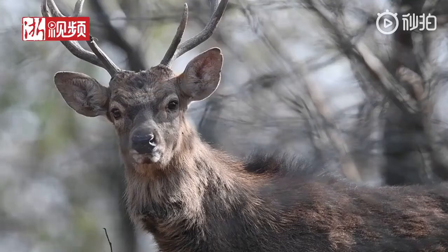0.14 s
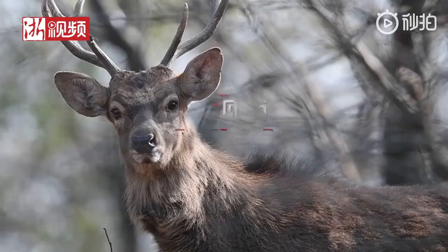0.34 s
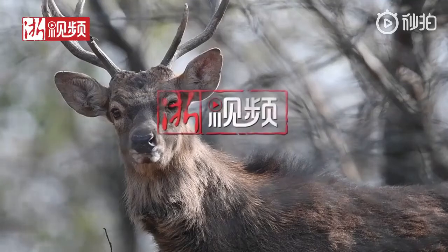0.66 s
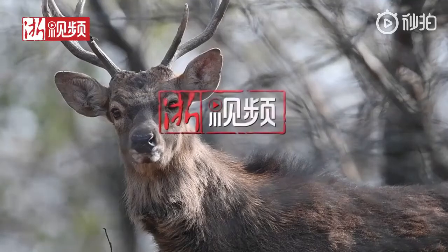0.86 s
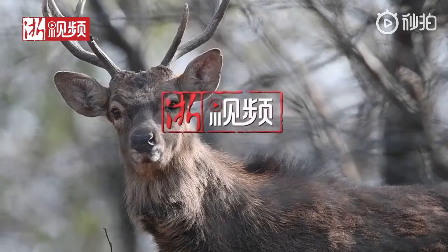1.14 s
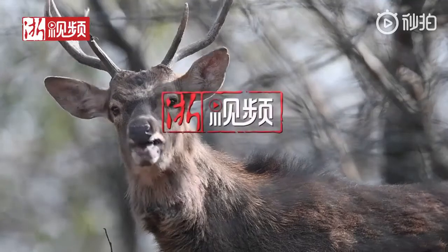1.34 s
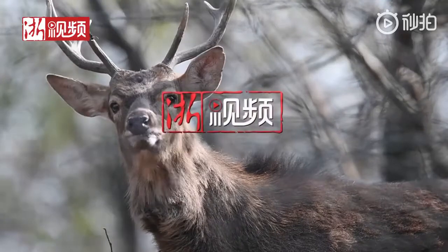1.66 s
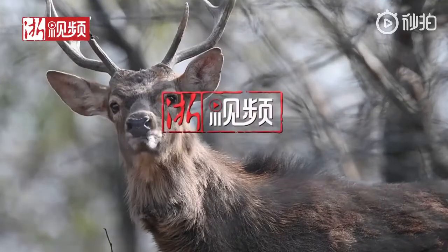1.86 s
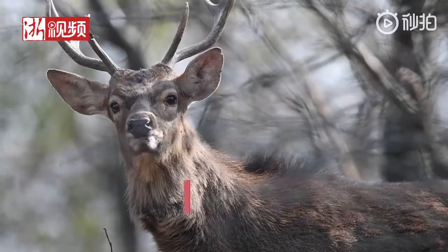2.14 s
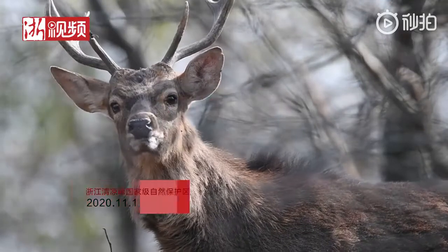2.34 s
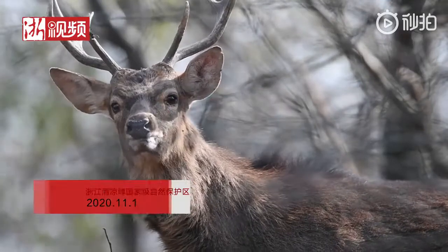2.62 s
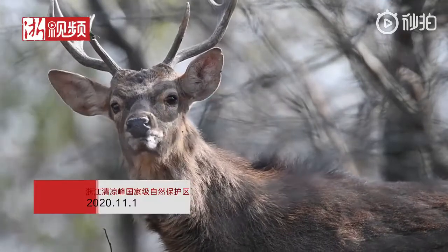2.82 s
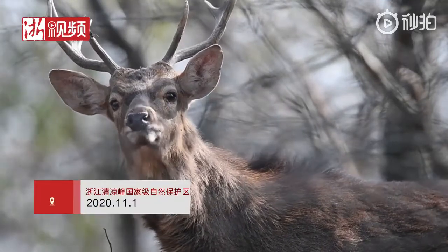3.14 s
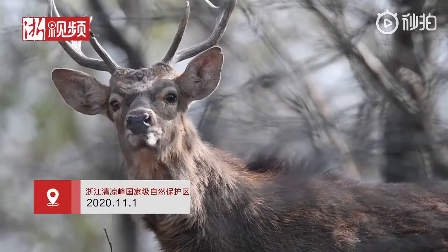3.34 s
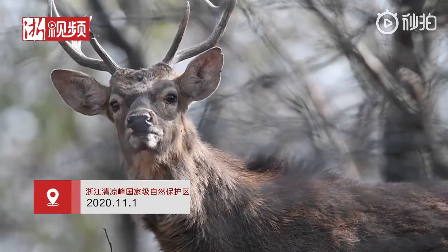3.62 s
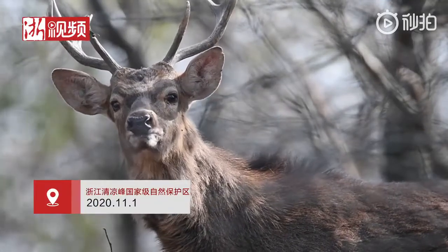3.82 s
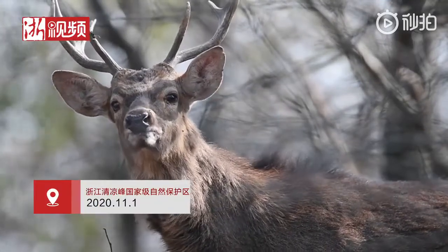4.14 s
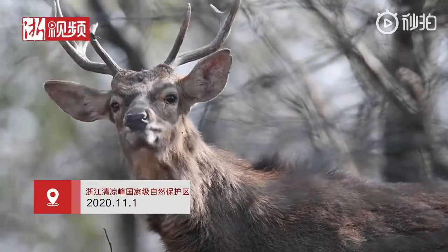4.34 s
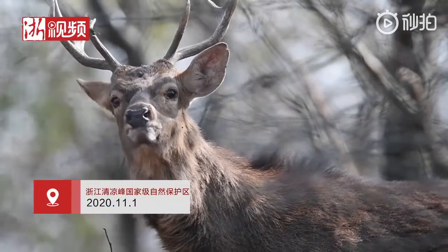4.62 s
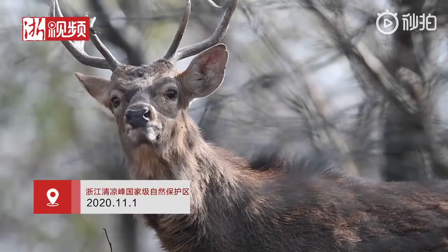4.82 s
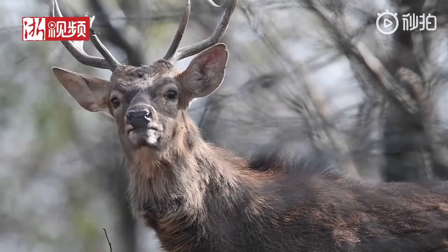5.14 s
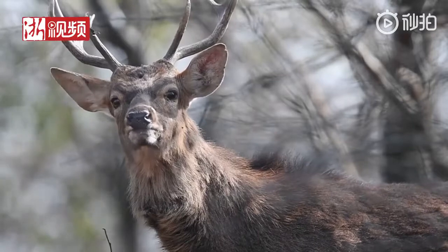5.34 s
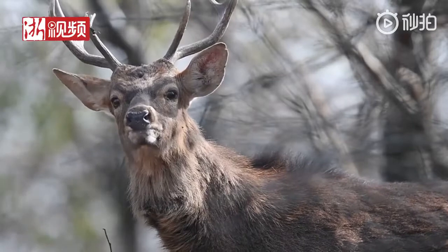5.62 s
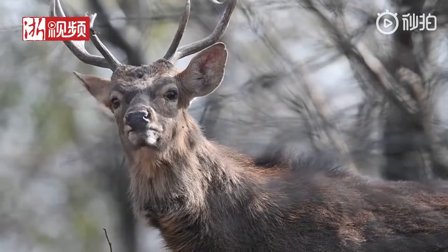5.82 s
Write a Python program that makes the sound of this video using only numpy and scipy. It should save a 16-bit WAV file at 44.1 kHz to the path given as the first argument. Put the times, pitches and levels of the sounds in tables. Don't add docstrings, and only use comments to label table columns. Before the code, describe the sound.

Three short, shrill deer whistles ring out among trees with long scattered tails, while breeze rustles leaves and lightly bumps the microphone.

```python
import sys
import numpy as np
from scipy import signal
from scipy.fft import rfft, irfft
from scipy.io import wavfile
from scipy.ndimage import uniform_filter1d, minimum_filter1d

SR = 44100
rng = np.random.default_rng(int(sys.argv[2]) if len(sys.argv) > 2 else 0)


def pcm_store(signal):
    levels = np.round(np.clip(np.atleast_2d(signal), -1, 1) * 32767)
    wavfile.write(sys.argv[1], SR, levels.astype(np.int16).T)


def makeup_ratio(level_db):
    decades = np.asarray(level_db, float) / 20
    return 10 ** decades


N = 263321

# [f/Hz, level/dB per Hz]
LEAF_SPECTRUM = [(18, -48.5), (30, -15), (56, -6), (154, -17), (364, -14.5), (460, -13.5), (716, -12.5),
                 (859, -14), (1090, -12.5), (2250, -10.5), (2990, -15.5), (5700, -16.5), (8250, -19.5),
                 (11300, -18), (15000, -30)]
# [f/Hz, share of swing]
GUST_SHARE = [(100, 0.33), (400, 1.1), (1500, .9), (5000, 0.9), (13000, .9)]
# [f/Hz, likeness 0..1]
LIKENESS = [(100, .9995), (250, .99), (500, .9), (800, .8), (1500, .55), (4000, .6), (12000, .5)]
# [f/Hz, lead/rad]
LEFT_LEAD = [(0, 0), (860, 0.3), (1810, 3.2), (2760, 3.9), (5000, 6.8), (5600, 9.1), (6030, 9.1),
             (8010, 19.5), (8440, 20.7), (9470, 20.8), (9910, 24.6), (11300, 25.5), (12700, 30.9),
             (14700, 31.9)]
# [peak t/s, level/dB over calm, rise/s, fall/s]
GUSTS = [
    (.55, 2.5, .3, .25),
    (.84, 7.5, .1, .2),
    (1.7, 7, 0.54, .2),
    (1.98, 2.5, .05, .2),
    (2.62, 3.5, 0.27, .35),
    (3.24, 8, .17, .2),
    (5.64, 9.5, 0.13, .55),
]
# [t/s, peak level/dB, f/Hz]
PUFFS = [(0.192, -49, 187), (0.291, -43.5, 132), (0.473, -39, 160), (0.61, -47, 92), (0.725, -44.5, 184),
         (0.82, -44, 103), (0.877, -47, 161), (1.191, -49.5, 122), (1.446, -47.5, 127),
         (1.705, -45.5, 210.4), (1.972, -35, 211), (2.111, -47, 116.7), (2.305, -45, 128),
         (2.528, -46, 168), (2.698, -46.5, 105), (2.732, -44.5, 180), (2.843, -40.5, 80), (2.888, -43, 108),
         (2.951, -40, 161), (3.317, -37.5, 162), (3.407, -44, 103), (3.502, -50, 105), (3.591, -46.5, 96),
         (3.662, -42, 196), (3.769, -45, 152), (4.344, -46, 119.2), (4.902, -55, 149.8), (5.071, -41, 189),
         (5.559, -49.5, 99), (5.786, -37, 116.4)]
# [peak t/s, level/dB over still air, rise/s, fall/s]
SPELLS = [(.27, 12, 0.2, .3), (.58, 21.5, 0.75, .22), (.85, 12, .05, .1), (1.97, 18, .04, .25),
          (2.55, 13, 0.24, .1), (3.0, 26.5, .42, .06), (3.32, 23, .2, .25), (3.69, 18.5, .2, .05),
          (3.79, 30, .05, .05), (4.36, 11, 0.025, .04), (4.91, 19, .05, .05), (5.09, 30.5, .14, .4),
          (5.81, 27.5, .13, .07)]
# [t/s, peak level/dB, f/Hz]
TWIG_TICKS = [
    (0.476, -49.5, 899),
    (2.956, -54, 1270),
    (5.515, -46, 609.5),
    (5.64, -40, 1210),
    (5.836, -46.5, 638),
]
# [t/s, pitch f/Hz, effort level/dB]
WHISTLE_1 = [
    (1.449, 3347, -31),
    (1.472, 3402, -21),
    (1.497, 3742, -7.5),
    (1.52, 3748, -9),
    (1.575, 3951, -5),
    (1.645, 3934, -6.5),
    (1.701, 3664, -4),
    (1.762, 3190, -23),
    (1.838, 1804, -56),
]
WHISTLE_2 = [
    (3.098, 3245, -34),
    (3.135, 3450, -9.5),
    (3.15, 3590, -10),
    (3.181, 3620, -5),
    (3.197, 3565, -13),
    (3.225, 3150, -21.5),
    (3.258, 2350, -46),
    (3.283, 1900, -66),
    (3.302, 1500, -53),
]
WHISTLE_3 = [
    (4.488, 3095, -38.5),
    (4.525, 3255, -11),
    (4.557, 3340, -8.5),
    (4.573, 3479, -7.5),
    (4.605, 3517, -3),
    (4.635, 3441, -10.5),
    (4.662, 3077, -12.5),
    (4.69, 2490, -47),
    (4.724, 1920, -53),
]
# [octave level/dB, upper overtone level/dB, rasp level/dB]
COLOURS = [
    (.4, -0.3, 1.05),
    (1.5, 6, 2),
    (2.5, -2.5, 0.3),
]
# [t/s, pitch f/Hz, effort level/dB]
SQUEAK = [
    (1.966, 1250, -58),
    (1.985, 1800, -63),
    (2.0, 2400, -63),
    (2.012, 2800, -58),
    (2.03, 3400, -58),
    (2.04, 3500, -70),
]
# [t/s, pitch f/Hz, effort level/dB]
SQUEAK_ECHO = [
    (2.005, 2010, -65),
    (2.04, 2695, -54.5),
    (2.075, 3050, -56),
    (2.13, 3110, -65),
]
# [f/Hz, width/Hz, boost/dB]
THROAT = [(1050, 90, 16), (1800, 100, 12), (2330, 110, 12), (2900, 150, 5)]
# [multiple, best f/Hz, width/Hz, level/dB]
UPPER_OVERTONES = [(3, 9800, 600, -25), (4, 13050, 650, -30)]
# [f/Hz, level/dB]
RASP = [(1500, -54.5), (2400, -41), (3500, -42), (4600, -38.5), (6000, -49), (7500, -44.5), (8800, -49),
        (9800, -40.5), (11500, -61.5), (13500, -55.5)]
# [t/s, half width/s, level/dB,
# partial]
PARTIAL_SWINGS = [(1.578, 0.018, -10, 1), (1.642, 0.0074, -22, 1), (1.8, 0.021, -13, 1), (4.643, 0.005, -4, 1),
                  (3.13, 0.033, -15, 2), (1.785, .025, -24.5, 2), (3.234, 0.0066, 8.5, 2), (3.256, 0.015, -29, 2),
                  (4.672, 0.0067, 7, 2), (4.66, .02, -12.5, 2), (4.695, .016, -23, 2), (1.48, .015, 12, 3),
                  (1.75, 0.018, 8.5, 3), (3.182, .012, -15, 3), (4.597, 0.016, -13.5, 3), (1.62, .04, -19.5, 4),
                  (1.6, .07, -9, 3), (1.74, .03, 10, 4), (4.6, .02, -13, 4),
                  (1.827, .007, -16, 1), (1.847, .003, -14, 1), (3.285, .014, -10, 1), (1.968, .012, -25, 2),
                        (2.022, .02, -40, 2)]
# [t/s, level/dB, f/Hz]
THROAT_CATCH = [
    (1.757, -44, 1850),
    (1.765, -50, 1400),
    (1.757, -49, 2350),
    (1.748, -54, 1300),
]
# [delay t/s, left level/dB, right level/dB, right sign]
ECHOES = [
    (.0006, -14, -15, -1),
    (.0021, -18.5, -15.5, 1),
    (.0047, -14, -13.5, -1),
    (.009, -12, -17.5, 1),
    (.016, -19, -17.5, -1),
    (.027, -20.5, -21, 1),
]
# [f/Hz, near t60/s, far t60/s, level/dB]
WOOD = [(1000, .3, .8, -11), (2400, 0.42, .9, -10), (3030, 0.58, 2.2, -5.5), (3536, 0.28, 1.66, -4),
        (4250, 0.44, 1.61, 1.5), (6960, 0.4, 0.63, -6), (13000, 0.18, 0.36, -3.5)]
# [start t/s, end t/s, f/Hz, level/dB]
THIN_TONE = (1.555, 1.69, 12231, -45)


def evened(x):
    return x / np.sqrt(np.mean(x ** 2) + 1e-20)


def read(points, hz, column=1):
    table = np.transpose(points)
    return np.interp(np.log(hz + 1), np.log(table[0] + 1), table[column])


def add(mix, start_s, sound):
    part = mix[round(start_s * SR):][:len(sound)]
    part += sound[:len(part)]


def swells(rows, t_s):
    ramps = [np.interp(t_s, [s - rise, s, s + fall], [0, db, 0]) for s, db, rise, fall in rows]
    return np.max(ramps, axis=0)


def leaves():
    frames, hz = N // 128 + 5, np.fft.rfftfreq(512, 1 / SR)
    a, b, c, d, patches = rng.standard_normal((frames, 257, 5)).T
    patches = uniform_filter1d(patches, size=8, axis=0)
    patches = evened(uniform_filter1d(patches, size=20, axis=1))
    gust_db = -0.5 + swells(GUSTS, np.arange(frames) * 128 / SR)
    likeness = read(LIKENESS, hz)[:, None]
    lag = np.exp(-1j * np.interp(hz, *np.transpose(LEFT_LEAD)))[:, None]
    left = a + 1j * b
    right = lag * (likeness * left + np.sqrt(1 - likeness ** 2) * (c + 1j * d))
    level_db = read(LEAF_SPECTRUM, hz)[:, None] + .8 * patches
    level_db = level_db + read(GUST_SHARE, hz)[:, None] * gust_db
    hiss = signal.istft(np.array([left, right]) * makeup_ratio(level_db), nperseg=512, noverlap=384)[1]
    return makeup_ratio(-55.5) * evened(hiss[:, :N])


def puff(hz, sign):
    cycles = np.arange(-1.5, 1.5, hz / SR)
    return sign * np.exp(-(cycles / 0.4) ** 2) * np.cos(2 * np.pi * cycles + 0.49)


def buffeting():
    snap_hz, snap_db = 350, -22.5
    still_db = -68.5
    out = np.zeros(N)
    for s, db, hz in PUFFS:
        sign = np.sign(rng.random() - .3)
        add(out, max(s + .006 - 1 / hz, 0), makeup_ratio(db - 0.5) * puff(hz, sign))
        add(out, s + 0.0028 - 1 / snap_hz, makeup_ratio(db + snap_db) * puff(snap_hz, sign))
    patter = np.zeros(N)
    for hz in (85, 123, 175.2, 239.2):
        hits = (rng.random(N) < 90 / SR) * rng.standard_normal(N)
        hits *= makeup_ratio(3.1 * np.minimum(rng.exponential(1, N), 2))
        patter += signal.oaconvolve(hits, puff(hz, 1))[:N]
    out += evened(patter) * makeup_ratio(still_db + swells(SPELLS, np.arange(N) / SR) - 9.5)
    return signal.lfilter(*signal.butter(2, 70 / SR * 2, "high"), out)


def twigs():
    out, t_s = np.zeros(N), np.arange(0, .004, 1 / SR)
    for s, db, hz in TWIG_TICKS:
        add(out, s, makeup_ratio(db - 60 * t_s / 0.0033) * np.cos(2 * np.pi * hz * t_s))
    return out


def bell(hz, centre_hz, width_hz):
    return 1 / (1 + ((hz - centre_hz) / width_hz) ** 2)


def partial_swing(t_s, order):
    rows = PARTIAL_SWINGS
    return sum(db * np.exp(-((t_s - s) / width_s) ** 2) for s, width_s, db, k in rows if k == order)


def whistle(rows, shake, octave_db, bright_db, rasp_db):
    s, *columns = np.transpose(rows)
    t_s = np.arange(s[0], s[-1], 1 / SR)
    count = len(t_s)
    hz, effort_db = (uniform_filter1d(np.interp(t_s, s, c), size=450, mode="nearest") for c in columns)
    effort_db = effort_db - 21.5 * np.exp(-(t_s - s[0]) / 0.0029)
    wobble = evened(uniform_filter1d(rng.standard_normal(count), size=150))
    phase = 2 * np.pi * np.cumsum(hz * (1 + shake * wobble)) / SR
    throat_db = sum(db * bell(hz, f_hz, width_hz) for f_hz, width_hz, db in THROAT) - 4.0
    tone = makeup_ratio(effort_db + partial_swing(t_s, order=1) + throat_db) * np.sin(phase)
    octave_level_db = 1.03 * effort_db - 19.5 + octave_db + partial_swing(t_s, order=2)
    tone += makeup_ratio(octave_level_db) * np.sin(2 * phase)
    for k, f_hz, width_hz, db in UPPER_OVERTONES:
        level_db = effort_db + db + bright_db + partial_swing(t_s, order=k)
        tone += makeup_ratio(level_db) * bell(k * hz, f_hz, width_hz) ** 3 * np.sin(k * phase)
    air_gain = makeup_ratio(read(RASP, np.fft.rfftfreq(count, 1 / SR)))
    air = irfft(rfft(rng.standard_normal(count)) * air_gain, count)
    air *= makeup_ratio(2.5 * evened(uniform_filter1d(rng.standard_normal(count), size=500)))
    sound = np.sqrt(2) * tone + 3.1 * air * makeup_ratio(1.15 * effort_db - 4.0 + rasp_db)
    return s[0], sound * signal.windows.tukey(count, .03)


def stag():
    plunge_s, plunge_hz, plunge_db = 0.0217, 867, -56
    out = np.zeros(N)
    for rows, colour in zip((WHISTLE_1, WHISTLE_2, WHISTLE_3), COLOURS):
        plunge = (rows[-1][0] + plunge_s, plunge_hz, plunge_db)
        add(out, *whistle([*rows, plunge], 0.0023, *colour))
    add(out, *whistle(SQUEAK, shake=.03, octave_db=33, bright_db=-3.0, rasp_db=38))
    add(out, *whistle(SQUEAK_ECHO, shake=0.13, octave_db=4.0, bright_db=-3.0, rasp_db=44))
    t_s = np.arange(-.03, .03, 1 / SR)
    flutter = np.exp(-(t_s / .009) ** 2) * np.cos(2 * np.pi * 32 * t_s)
    for s, db, hz in THROAT_CATCH:
        add(out, s - .03, makeup_ratio(db) * flutter * np.sin(2 * np.pi * hz * t_s))
    return out


def wood(x):
    taps = np.zeros((2, 2 * SR))
    at = np.arange(0, 2 * SR - 20, 20) + rng.integers(0, 20, (2, (2 * SR - 1) // 20))
    np.put_along_axis(taps, at, rng.choice([-1., 1.], at.shape), axis=1)
    taps *= np.clip(np.arange(2 * SR) / SR / 0.023 - .3, 0, 1)
    hz, t_s, z = signal.stft(taps, SR, nperseg=256)
    near = makeup_ratio(-60 * t_s / read(WOOD, hz)[:, None])
    far = makeup_ratio(-25.0 - 60 * t_s / read(WOOD, hz, column=2)[:, None])
    scatter = makeup_ratio(read(WOOD, hz, column=3))[:, None]
    tail = signal.istft(z * (near + far) * scatter, SR, nperseg=256)[1]
    tail *= makeup_ratio(-17.0) / np.linalg.norm(tail[0])
    tail[:, 0] += makeup_ratio([.6, -1.0])
    for s, left_db, right_db, sign in ECHOES:
        tail[:, round(s * SR)] += makeup_ratio([left_db, right_db]) * [1, sign]
    return signal.fftconvolve(x[None], tail, axes=1)[:, :N]


def scene():
    return wood(stag()) + leaves() + twigs() + buffeting()


def limiter(x, ceiling):
    room = np.minimum(ceiling / (abs(x).max(axis=0) + 1e-9), 1)
    return x * uniform_filter1d(minimum_filter1d(room, size=400), size=400)


def band_power(z, band_bins=8):
    power = uniform_filter1d(abs(z) ** 2, size=8, axis=2)
    blocks = power[:, :-1].reshape(2, -1, band_bins, z.shape[2]).mean(axis=2)
    block_of_bin = np.minimum(np.arange(z.shape[1]) // band_bins, blocks.shape[1] - 1)
    return abs(blocks[:, block_of_bin]) + 1e-20


def rebuilt_treble(x, most_db=24, noise_share=.4):
    treble_bin, top_bin, shift_bins = 112, 176, 72
    mask_bin, mask_db, tilt_db_per_khz = 72, -38, 1.5
    shadow_bin, shadow_db, quiet_db = 40, 30, 11
    treble_start_s = .335
    hz, t_s, z = signal.stft(x, SR, nperseg=512, noverlap=384)
    heard = (abs(z) ** 2).mean(axis=0)
    copy = np.roll(z, shift_bins, axis=1)
    target = np.sqrt(band_power(z))
    match = np.minimum(target / np.sqrt(band_power(copy)), makeup_ratio(most_db))
    noise = signal.stft(rng.standard_normal(x.shape), nperseg=512, noverlap=384)[2]
    noise /= np.sqrt(np.mean(abs(noise) ** 2))
    rebuilt = np.sqrt(1 - noise_share ** 2) * copy * match + noise_share * target * noise
    z[:, treble_bin:] = rebuilt[:, treble_bin:] * (t_s > treble_start_s)
    z[:, top_bin:] = 0
    level_db = 20 * np.log10(target).mean(axis=0) + tilt_db_per_khz * hz[:, None] / 1000
    level_db = level_db[mask_bin:]
    z[:, mask_bin:] *= level_db > np.maximum.accumulate(level_db, axis=0) + mask_db
    smooth = uniform_filter1d(uniform_filter1d(heard, size=3, axis=0), size=12, axis=1)
    fine_db = 10 * np.log10(abs(smooth) + 1e-20)
    below_db = np.roll(-minimum_filter1d(-fine_db, size=9, axis=0), shift=6, axis=0)
    quiet = fine_db < np.median(fine_db, axis=1)[:, None] + quiet_db
    shadowed = quiet & (below_db > fine_db + shadow_db)
    z[:, shadow_bin:] *= ~shadowed[shadow_bin:]
    return signal.istft(z, SR, nperseg=512, noverlap=384)[1][:, :N]


def thin_tone(t_s):
    start_s, end_s, hz, db = THIN_TONE
    gate = np.clip(np.minimum((t_s - start_s) * 250, (end_s - t_s) * 40), 0, 1)
    return makeup_ratio(db) * gate * np.sin(2 * np.pi * hz * t_s) * makeup_ratio([[5.0], [-12]])


def roll_off(x):
    return signal.sosfilt(signal.butter(12, 15200, fs=SR, output="sos"), x)


def record(dry):
    t_s = np.arange(N) / SR
    mix = rebuilt_treble(limiter(dry, ceiling=.85)) + thin_tone(t_s)
    opening = np.clip((t_s - .08) / 0.0092, 0, 1)
    return roll_off(mix * opening)


dry = scene()
out = record(dry)
pcm_store(out)
```